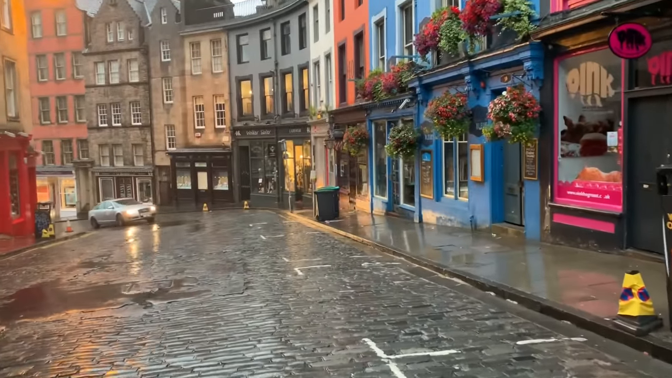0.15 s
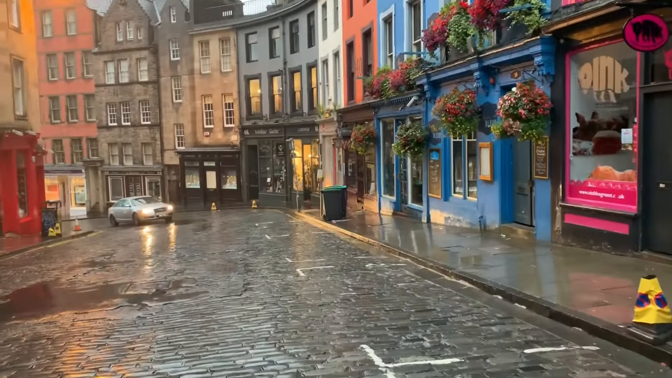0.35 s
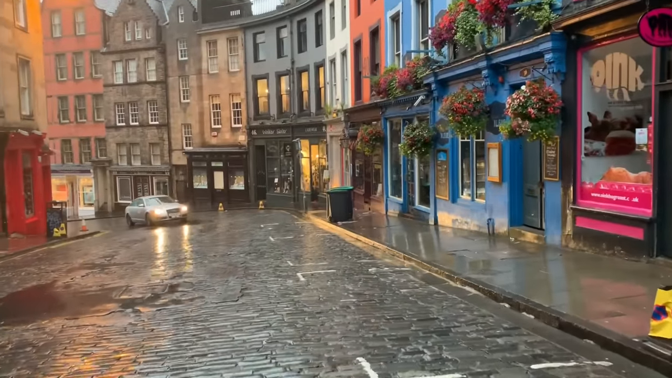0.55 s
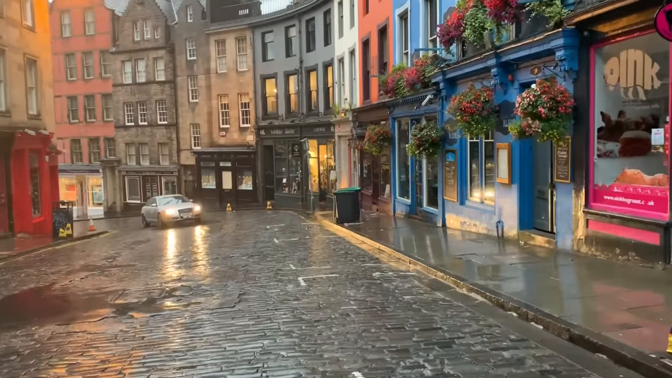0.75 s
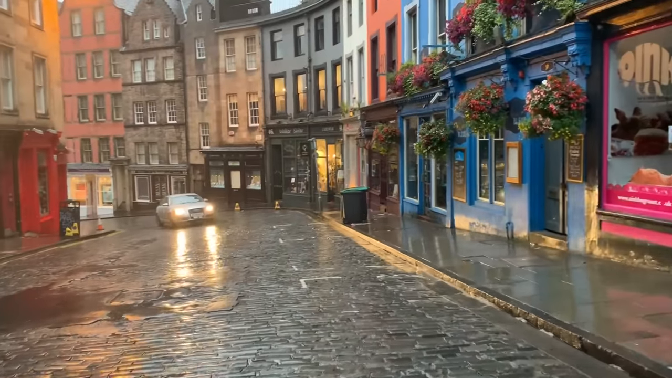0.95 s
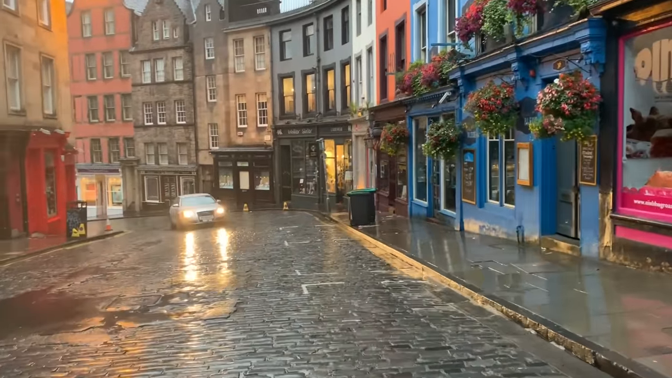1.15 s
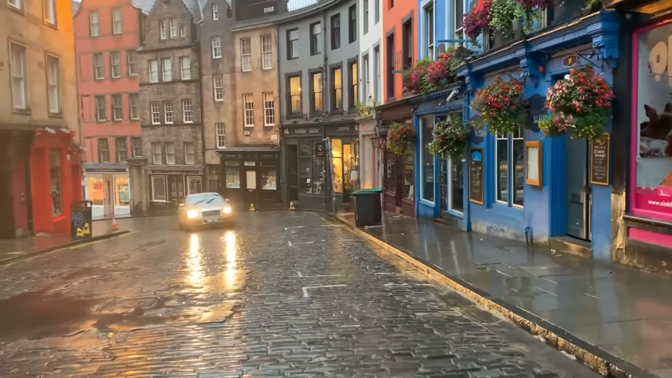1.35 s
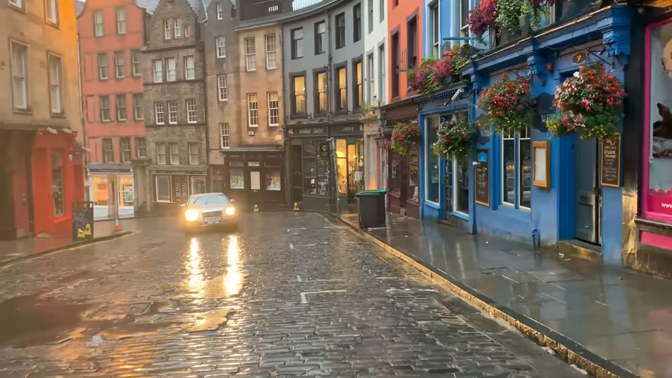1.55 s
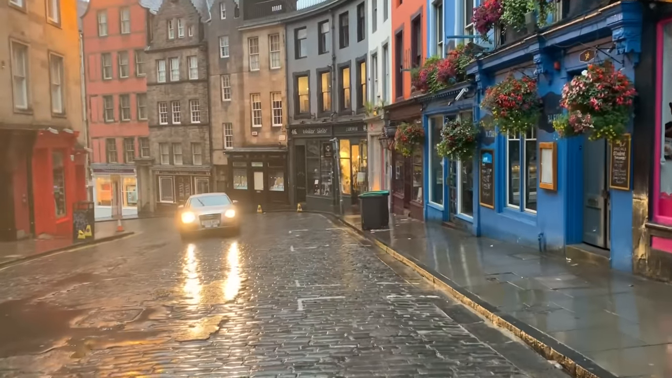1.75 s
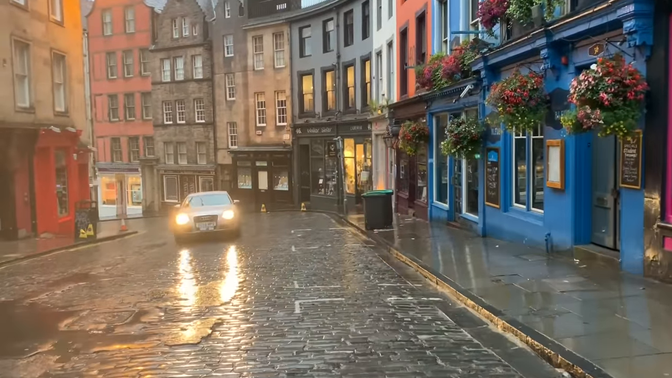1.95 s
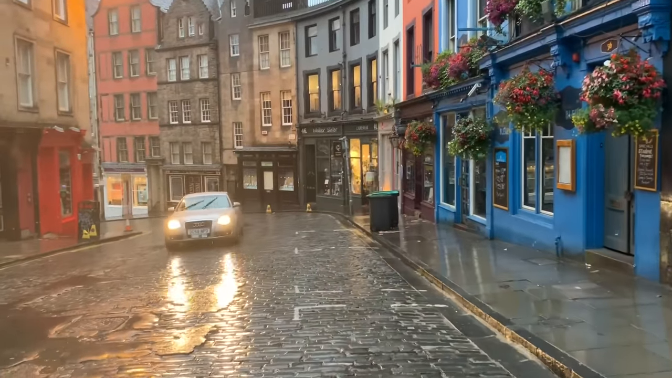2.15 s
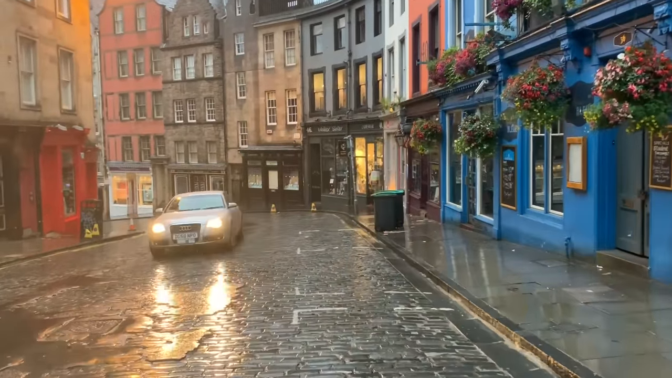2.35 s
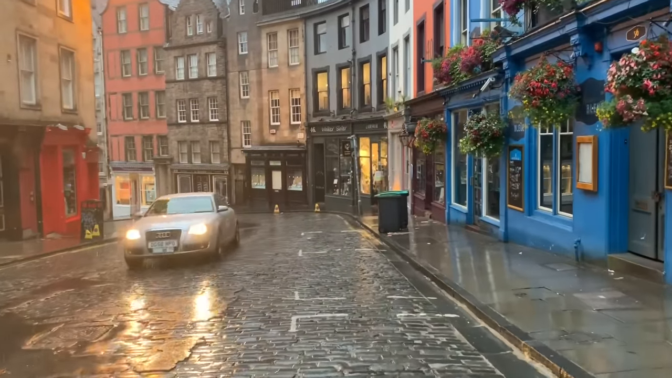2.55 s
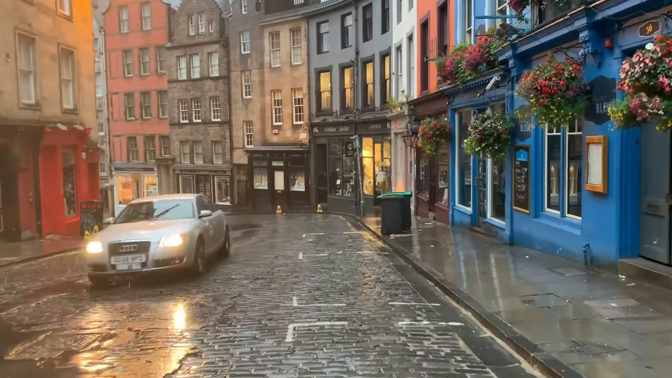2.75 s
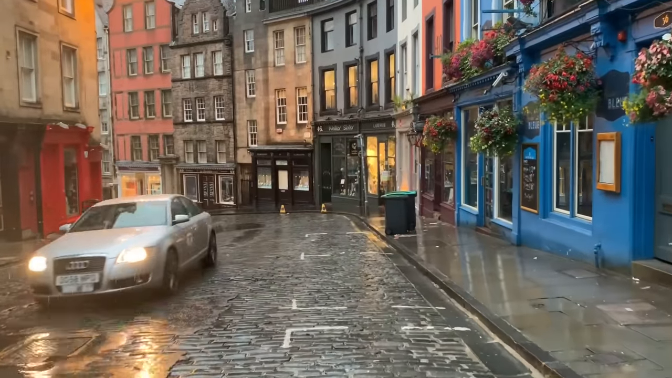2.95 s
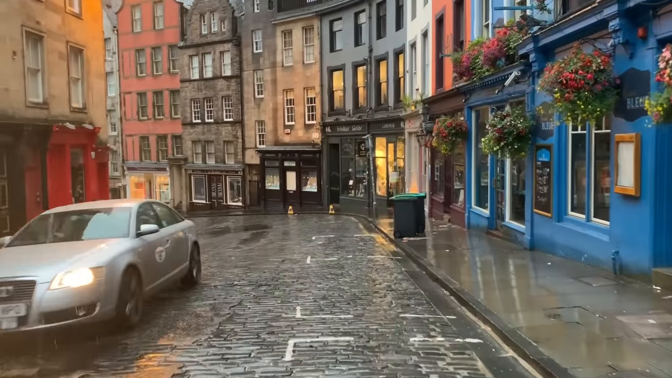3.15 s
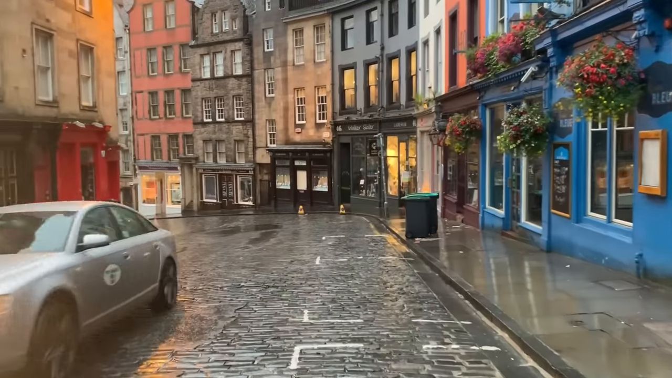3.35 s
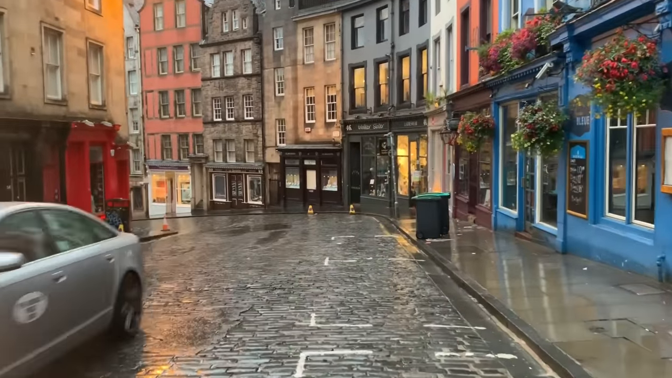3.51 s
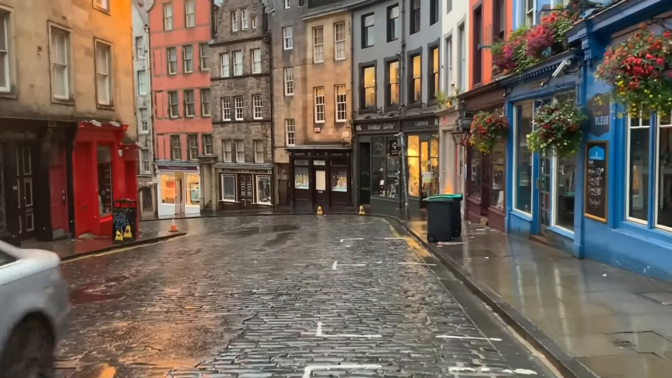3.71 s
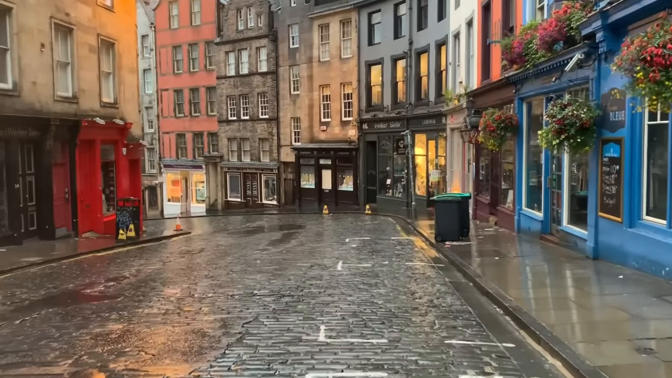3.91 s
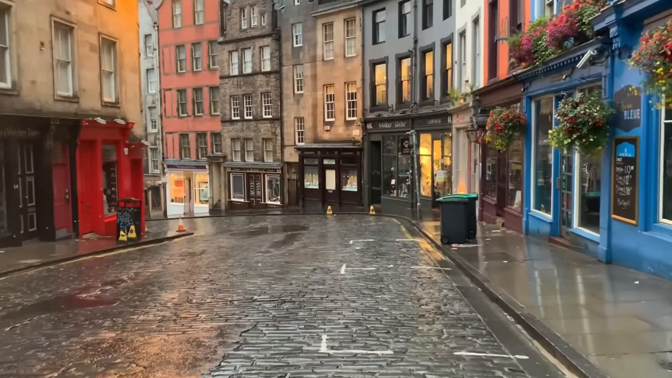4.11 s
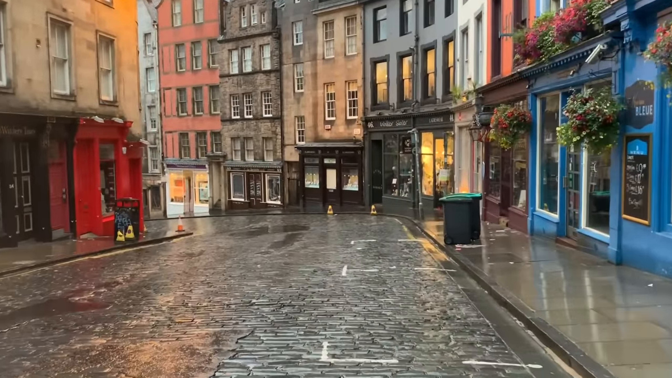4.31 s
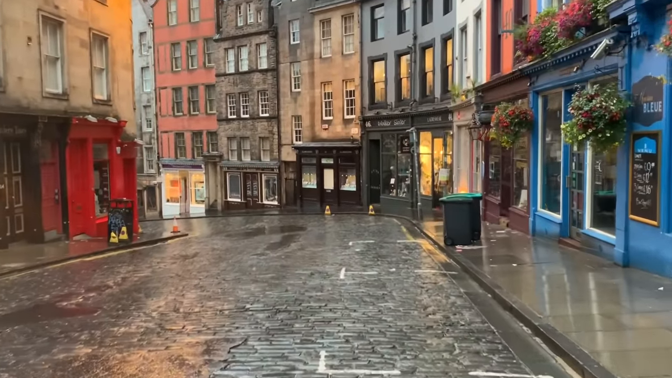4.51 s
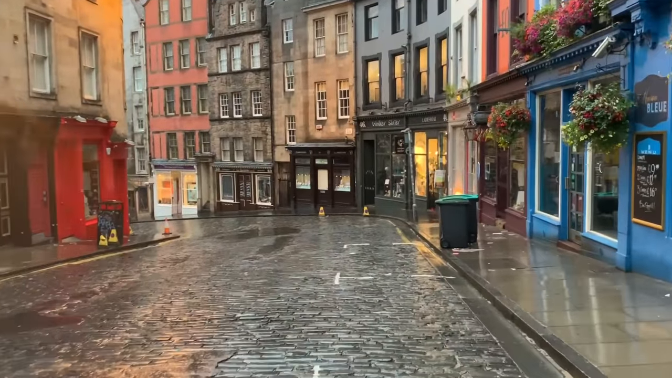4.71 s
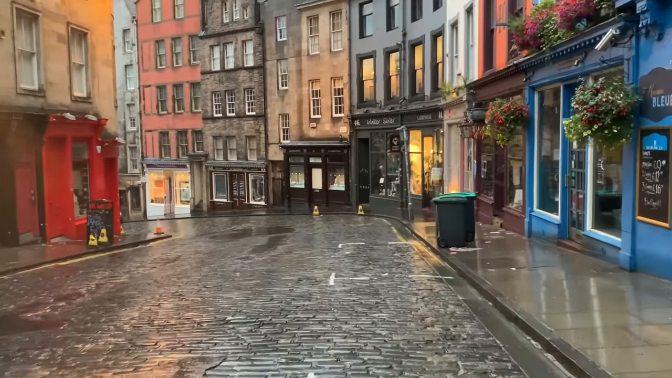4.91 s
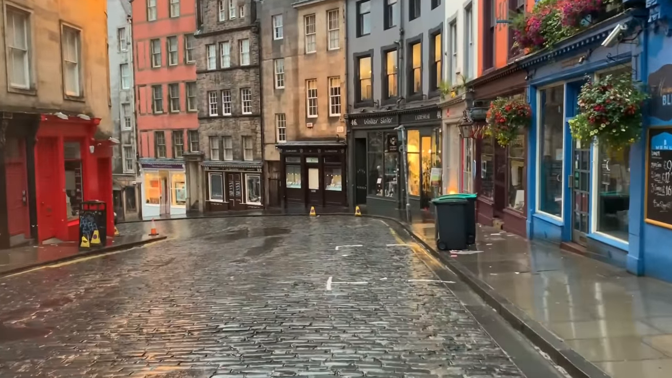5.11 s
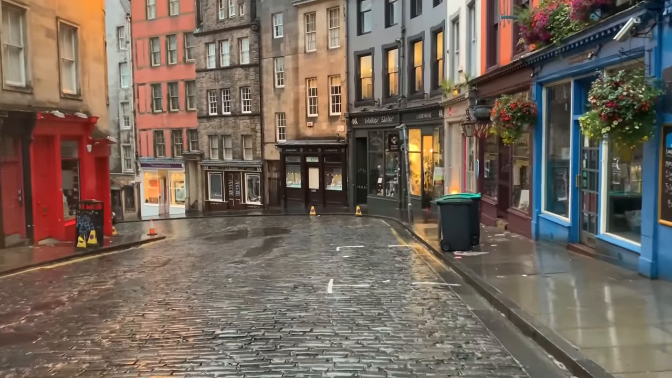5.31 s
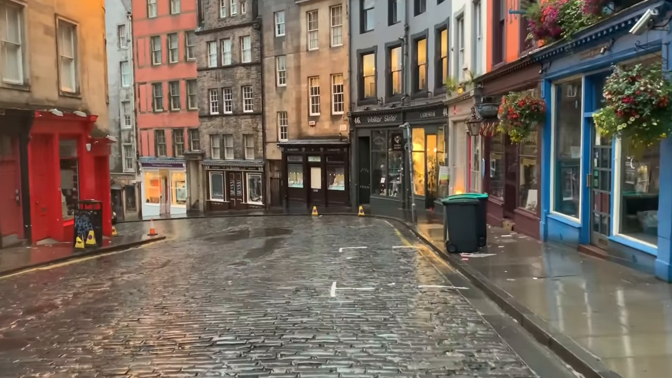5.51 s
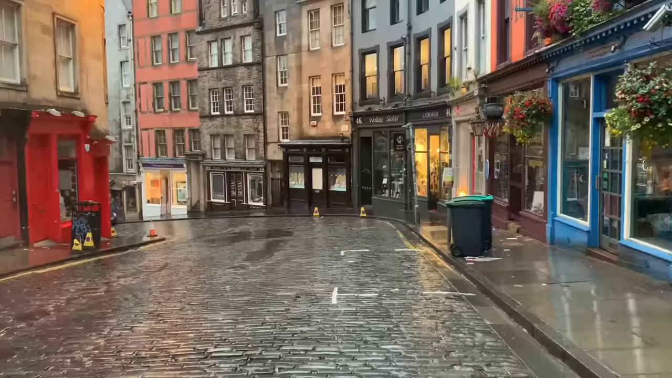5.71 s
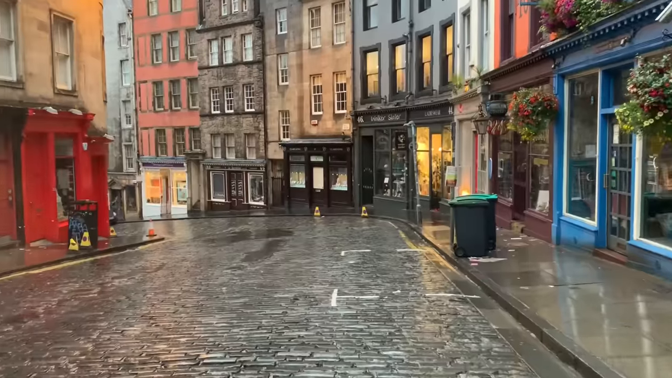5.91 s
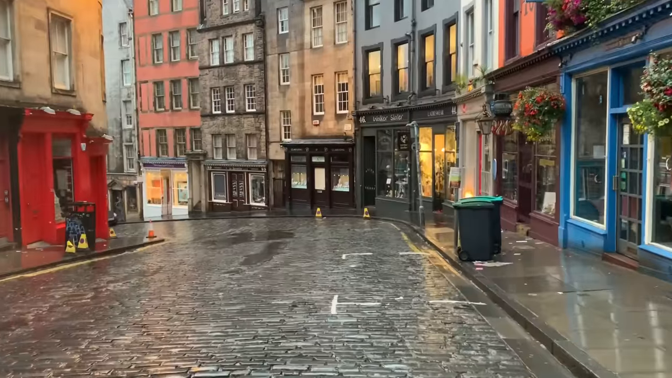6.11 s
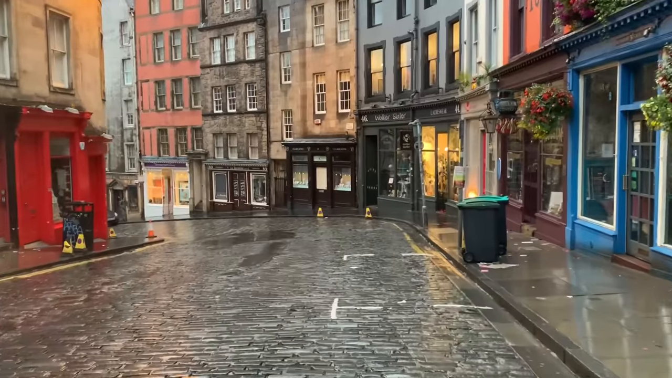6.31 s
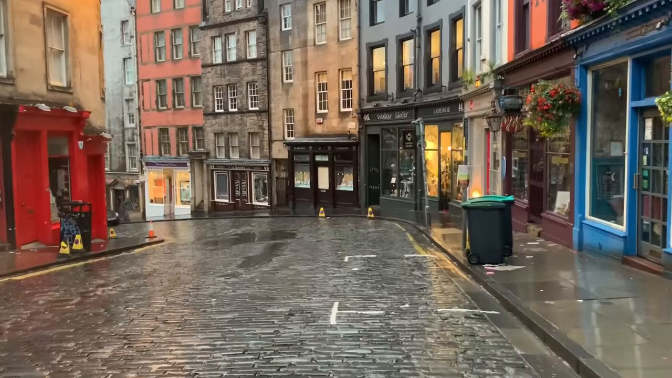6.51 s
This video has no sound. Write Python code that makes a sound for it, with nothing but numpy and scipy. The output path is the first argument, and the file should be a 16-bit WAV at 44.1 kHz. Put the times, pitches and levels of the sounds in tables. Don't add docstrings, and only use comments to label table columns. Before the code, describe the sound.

From a small stereo device standing at the kerb: a car comes up a wet street, engine pitch climbing slightly, tyre rumble and water hiss growing. Around the middle it sweeps past on the left, spray bursting, splashes snapping, stones thumping hollowly against the tyres. Afterwards the roar fades into diffuse house-front echoes, low rumble and thin rain.

```python
import sys
import numpy as np
from scipy import signal
from scipy.fft import rfft, irfft, next_fast_len
from scipy.io import wavfile
from scipy.ndimage import map_coordinates

SR = 44100
rng = np.random.default_rng(int(sys.argv[2]) if len(sys.argv) > 2 else 0)


def volts_from_db(level):
    exponent = np.asarray(level, float) / 20
    return 10 ** exponent


def wrap_up_sound(samples):
    columns = np.atleast_2d(samples).T
    tamed = np.clip(columns, -1, 1)
    steps = np.round(tamed * 32767).astype(np.int16)
    wavfile.write(sys.argv[1], SR, steps)


N = 293694
TIME_S = np.arange(N) / SR


def rms_one(x):
    return x / np.sqrt(np.mean(x ** 2) + 1e-20)


def in_time(rows):
    s, *columns = np.transpose(rows)
    return [np.interp(TIME_S, s, c) for c in columns]


def ramp(start_s, end_s):
    return np.interp(TIME_S, [start_s, end_s], [0, 1])


def at_hz(points, hz):
    points_hz, values = np.transpose(points)
    return np.interp(np.log(np.maximum(hz, 1)), np.log(points_hz), values)


def bumps(rows):
    return sum(height * np.exp(-(2 * (TIME_S - s) / length) ** 2) for s, height, length in rows)


def swells(rows):
    return bumps([(s, volts_from_db(peak_db), length) for s, peak_db, length in rows])


def drift(rate):
    r = np.exp(-40 * np.pi * rate / SR)
    chance = rng.standard_normal(N // 20 + 2002)
    slow = signal.lfilter([1], [1, -2 * r, r * r], chance)[2000:]
    return np.interp(np.arange(N) / 20, np.arange(len(slow)), rms_one(slow))


def phase(hz):
    return 2 * np.pi * np.cumsum(hz) / SR


def grains(per_s, spread_db):
    sizes = volts_from_db(spread_db * np.minimum(rng.exponential(1, N), 4)) * rng.choice([-1, 1], N)
    return rms_one(sizes * (rng.random(N) < per_s / SR))


def coloured(excitation, spectrum, shared_db, own_db, rate):
    size = next_fast_len(N)
    hz = np.fft.rfftfreq(size, 1 / SR)
    level_db = at_hz(spectrum, hz)
    shaped = rfft(excitation, size) * volts_from_db(level_db) * (level_db > -38)
    strip = np.floor(2 * np.log2(np.maximum(hz, 1)))
    together = shared_db * drift(rate)
    out = np.zeros(N)
    for k in np.unique(strip[shaped != 0]):
        flicker = volts_from_db(together + own_db * drift(rate / 2))
        out += irfft(shaped * (strip == k), size)[:N] * flicker
    return rms_one(out)


def rain():
    band = signal.butter(2, [1500, 9000], "band", fs=SR, output="sos")
    sides = [rms_one(signal.sosfilt(band, grains(per_s=1500, spread_db=9.0))) for side in "LR"]
    return volts_from_db(-51) * np.array(sides)


# (time [s], firing rate [Hz])
FIRING = [(0, 54.07), (1.2, 55.03), (1.6, 56.12), (2.2, 58.33), (2.7, 61.56), (3.3, 63.63), (3.8, 62.92),
          (4.3, 63.93), (5.2, 64.7), (6.66, 64.14)]


def firing_phase():
    firing_hz, = in_time(FIRING)
    return phase(firing_hz * (1 + 0.0074 * drift(5.25)))


# (time [s], peak [dB], length [s])
SURGES = [(0.05, -34, 0.16), (0.62, -38, 0.32), (1.15, -31, 0.14), (1.4, -26, 0.31), (1.7, -33, 0.25),
          (1.94, -25, 0.17), (2.22, -25.5, 0.24), (2.45, -28, 0.13), (2.78, -23.5, 0.34),
          (3.05, -23.5, 0.18), (3.29, -19.5, 0.29), (3.55, -22, 0.11), (3.76, -21, 0.15),
          (4.1, -20.5, 0.22), (4.4, -25, .3), (4.7, -26.5, 0.22), (5.0, -25, 0.28), (5.15, -20.5, 0.11),
          (5.4, -27.5, 0.34), (5.75, -28.5, 0.32), (6.1, -30.5, 0.38), (6.47, -31.5, 0.18)]
# (multiple [x], level re hum [dB])
MULTIPLES = [(.5, -32), (2, -17.5), (3, -12.5), (5, -16.5), (6, -22)]


def hum(turn):
    idle_db, trim_db, waver_db = -43, -0.6, 1.16
    level = (swells(SURGES) + volts_from_db(idle_db)) * volts_from_db(trim_db + waver_db * drift(8.5))
    out = level * np.sin(turn)
    for multiple, level_db in MULTIPLES:
        waver = volts_from_db(level_db + 2.2 * drift(2.9))
        out = out + level * waver * np.sin(multiple * turn + rng.uniform(0, 2 * np.pi))
    return np.sqrt(2) * out


# (time [s], peak [dB], length [s])
BOOMS = [(0.146, -34, 0.35), (0.577, -36, 0.43), (0.83, -39, 0.23), (1.016, -29, 0.058),
         (1.242, -32, 0.066), (1.625, -21.5, 0.17), (1.803, -25, 0.056), (2.17, -21.5, 0.072),
         (2.37, -27.5, 0.14), (2.57, -25, 0.08), (2.82, -49, 0.072), (3.02, -23.5, 0.12),
         (3.345, -23.5, 0.15), (3.562, -16.5, 0.2), (3.741, -22, 0.1), (3.92, -27.5, .15), (4.3, -41, 0.23),
         (4.58, -28, 0.07), (4.841, -30.5, 0.11), (5.031, -35, .1), (5.2, -32, 0.36), (5.42, -41, 0.063),
         (5.55, -30.5, .12), (5.93, -42, 0.24), (6.5, -36, 0.16)]


def boom(turn):
    idle_db = -44
    return np.sqrt(2) * (volts_from_db(-4) * swells(BOOMS) + volts_from_db(idle_db)) * np.sin(4 * turn)


# (time [s], pitch [Hz], level [dB])
WHISTLE = [(0, 13150, -85), (1.8, 13150, -64), (2.1, 13100, -55), (3.0, 13000, -52), (3.3, 12750, -48),
           (3.6, 12550, -46), (3.8, 12400, -65), (6.66, 12400, -90)]


def whistle():
    whistle_hz, whistle_db = in_time(WHISTLE)
    return volts_from_db(whistle_db + 3.0 * drift(15)) * np.sin(phase(whistle_hz + 60 * drift(60)))


# (time [s], nearness as spray level [dB], unevenness of the paving [dB])
PASS = [(0, -52.5, 0), (.4, -51, 0.5), (.75, -49.5, 0.5), (.95, -46, -2.5), (1.3, -46.5, -0.1),
        (1.55, -42, 0.5), (2.0, -42.5, 0.5), (2.4, -40.5, 1.5), (2.75, -37, 2), (2.999, -33.5, 2.4),
        (3.3, -31, -1), (3.7, -29.5, 0.6), (4.05, -34.5, 1.5), (4.45, -40.5, 0.5), (4.9, -43.5, 0.5),
        (5.3, -46, 0.9), (5.75, -49.5, 1), (6.66, -54.5, 1.2)]
GONE_S = (4.4, 4.9)


def heard(alongside_db, near_share, rough_share, lag_s, tail_db):
    s, near_db, rough_db = np.transpose(PASS)
    closest_db = -30
    near = near_share * (np.interp(TIME_S - lag_s, s, near_db) - closest_db)
    rough = rough_share * np.interp(TIME_S, s, rough_db)
    return alongside_db + near + rough + tail_db * ramp(*GONE_S)


# (frequency [Hz], density [dB per Hz])
RUMBLE = [(15, -40), (25, -16.5), (49, 4), (64, -5.5), (91, 0), (155, -4.5), (243, -3.5), (349, -13),
          (450, -18), (580, -52), (990, -120)]
# (time [s], more rumble [dB], length [s])
HUMPS = [
    (1.3, -1, .3),
    (2.5, -.7, 0.22),
    (3.05, 2, 0.28),
    (3.3, -2.5, 0.2),
    (4.25, -2, 0.17),
    (4.85, -2, 0.41),
    (5.3, 3.0, .2),
    (5.7, 2.5, .3),
    (6.3, 2, 0.27),
]


def rumble(joints):
    level_db = heard(alongside_db=-23, near_share=.5, rough_share=0.67, lag_s=0.14, tail_db=2.5) + bumps(HUMPS)
    shaking = rng.standard_normal(N) + .15 * joints
    return volts_from_db(level_db + 1.5) * coloured(shaking, RUMBLE, shared_db=.3, own_db=.7, rate=8)


# (frequency [Hz], density [dB per Hz])
ROAR_COMING = [(220, -34), (380, -7.5), (542, -1.5), (715, -6.5), (960, -9.5), (1130, -6.5), (1330, -15.5),
               (1600, -14), (2080, -22), (3520, -120)]
ROAR_CLOSE = [(220, -10), (380, -4.5), (439, 0), (529, -3), (641, 1.5), (741, -2.5), (880, 1), (1220, -7),
              (1600, -25), (2080, -89), (3520, -120)]
ROAR_GONE = [(220, -14.5), (380, -5.5), (421, 1), (463, -5), (555, -5), (600, -4.5), (920, -2.5),
             (1600, -16.5), (2080, -73), (3520, -120)]
# (time [s], more roar [dB], length [s])
STRETCHES = [(1.02, 5, 0.081), (1.95, 3.5, 0.048), (2.5, 1.5, 0.54), (2.78, 3, 0.073), (3.52, -4.5, 0.061),
             (3.72, -0.5, 0.36), (3.87, -7, 0.053), (4.0, 0.5, 0.071), (4.21, 3, 0.071), (4.4, -1, 0.18),
             (4.67, -0.5, 0.087), (5.3, 0.5, 0.25)]


def roar(joints):
    level_db = heard(alongside_db=-23.5, near_share=0.5753, rough_share=0.89, lag_s=0.27, tail_db=0)
    near, gone = ramp(1.5, 2.6), ramp(*GONE_S)
    drumming = rng.standard_normal(N) + 0.55 * joints
    stages = ((1 - near, ROAR_COMING), (near - gone, ROAR_CLOSE), (gone, ROAR_GONE))
    out = sum(share * coloured(drumming, colour, shared_db=1.2, own_db=0.8, rate=19)
              for share, colour in stages)
    return volts_from_db(level_db + bumps(STRETCHES) + 0.9) * out


# (frequency [Hz], density [dB per Hz])
HISS_COMING = [(760, -36), (1300, -1.5), (1430, -5.5), (2250, -4), (2430, -6), (3790, -12), (5590, -18.5),
               (7000, -25.5), (9100, -19.5), (15400, -120)]
HISS_BESIDE = [(760, -18), (1300, -6), (1640, -4.5), (2780, -4), (3490, -8.5), (5000, -9), (7000, -15.5),
               (9100, -25), (15400, -120)]
# (time [s], more hiss [dB], length [s])
PUDDLES = [
    (.7, 1.5, 0.28),
    (1.3, 1.5, 0.39),
    (1.618, 0.5, 0.36),
    (2.55, 1, 0.26),
    (3.22, 4.5, 0.13),
    (3.4, 3, 0.28),
    (4.2, -.7, 0.18),
    (4.856, 2.5, 0.36),
    (5.298, 2, 0.49),
]


def hiss(joints, drops):
    level_db = heard(alongside_db=-30.5, near_share=0.94, rough_share=0.5, lag_s=-0.0043, tail_db=-0.9)
    level_db = level_db + bumps(PUDDLES)
    street_db = -47
    beside = ramp(2.5, 3.2)
    squeeze = rng.standard_normal(N) + 0.48 * joints + 0.24 * drops
    stages = ((1 - beside, HISS_COMING), (beside, HISS_BESIDE))
    out = sum(share * coloured(squeeze, colour, shared_db=1.97, own_db=1.4, rate=63)
              for share, colour in stages)
    return np.hypot(volts_from_db(level_db + 5.5), volts_from_db(street_db + 4.5)) * out


# (frequency [Hz], density [dB per Hz])
SPRAY = [(5000, -25), (6300, -8), (7500, -6), (8150, -2), (8700, -3), (9350, 0), (10100, -2), (11400, -2),
         (12200, -4), (14000, -4.5), (15700, -4.5), (17000, -8)]


def spray(drops):
    level_db = in_time(PASS)[0] + 0.2
    bursting = rng.standard_normal(N) + .6 * drops
    return volts_from_db(level_db + 3.5) * coloured(bursting, SPRAY, shared_db=.75, own_db=.5, rate=45)


def tyres():
    joints = grains(per_s=400, spread_db=2.8)
    mist, big_drops = grains(per_s=3500, spread_db=0.5), grains(per_s=180, spread_db=4.0)
    drops = mist + 0.6 * big_drops
    return rumble(joints) + roar(joints) + hiss(joints, drops) + spray(drops)


# (time [s], peak [dB], middle of the splash [Hz])
SPLASHES = [(0.6948, -33, 3500), (1.39, -22, 8190), (1.429, -20, 11600), (1.5294, -37, 7910),
            (1.7, -19.5, 11200), (1.9494, -30, 8150), (2.516, -25, 3000), (2.546, -24, 8100),
            (2.7174, -18, 11100), (2.836, -14, 4500), (2.9094, -36, 10900), (2.9366, -6.5, 4000),
            (2.9544, -29, 11700), (3.023, -23, 11400), (3.181, -12, 7000), (3.226, -9, 5000),
            (3.247, -16, 7000), (3.291, -18, 6000), (3.318, -11, 10930), (3.355, -18, 7000),
            (3.381, -13, 4120), (3.401, -16, 9000), (3.445, -19, 6000), (3.6114, -13, 10520),
            (3.6977, -19, 11100), (3.724, -10, 3100), (3.9194, -29, 8360), (4.0493, -10, 8210),
            (4.2795, -23, 11850), (4.554, -21, 11000), (4.6074, -21, 3500), (4.721, -26, 3000),
            (4.978, -22, 3300), (5.2002, -21, 3830), (6.19, -35, 3740), (6.5045, -33, 10330)]


def splashes():
    out, t = np.zeros(N + SR), np.arange(SR // 5) / SR
    rise_s, t60_s = 0.0068, 0.044
    shape = (1 - np.exp(-t / rise_s)) * volts_from_db(0.5 - 60 * t / t60_s)
    for s, peak_db, mid_hz in SPLASHES:
        edges_hz = [mid_hz * .3, min(mid_hz * 2.4, .45 * SR)]
        band = signal.butter(1, edges_hz, "band", fs=SR, output="sos")
        burst = rms_one(signal.sosfilt(band, rng.standard_normal(len(t))))
        out[round(s * SR):][:len(t)] += volts_from_db(peak_db) * shape * burst
    return out[:N]


# (time [s], peak [dB], ring [Hz])
STONES = [(1.951, -17.5, 950), (2.049, -21.5, 633), (2.075, -29, 563), (2.118, -17, 855), (2.136, -17, 746),
          (2.342, -25, 770), (2.391, -19, 1140), (2.455, -21, 540), (2.518, -21, 724), (2.593, -17.5, 641),
          (2.626, -18.5, 720), (2.668, -16, 1020), (2.773, -20, 565), (2.842, -15, 610), (2.87, -18, 921),
          (2.938, -21, 745), (2.992, -18, 563), (3.058, -18, 915), (3.118, -11, 888), (3.14, -15.5, 501),
          (3.19, -17, 767), (3.245, -18, 863), (3.278, -15, 853), (3.303, -17.5, 567), (3.347, -20, 627),
          (3.392, -15, 830), (3.413, -18, 610), (3.443, -22, 591), (3.472, -14.5, 639), (3.545, -22, 519),
          (3.596, -12, 850), (3.614, -10, 689), (3.657, -10.5, 796), (3.687, -13, 826), (3.734, -16, 790),
          (3.762, -6, 851), (3.809, -9, 660), (3.851, -9.5, 640), (3.913, -15, 622), (3.972, -7.5, 710),
          (4.03, -15, 674), (4.052, -16, 510), (4.08, -12, 800), (4.11, -3.5, 781), (4.137, -14, 780),
          (4.164, -11.5, 730), (4.194, -9, 773), (4.279, -20, 903), (4.323, -8.5, 678), (4.417, -13, 741),
          (4.436, -18, 740), (4.462, -12.5, 785), (4.506, -24, 794), (4.549, -11.5, 910),
          (4.607, -17.5, 588)]


def stones():
    out, t = np.zeros(N + SR), np.arange(SR // 10) / SR
    crack_db, belt_cycles = -9, 23
    at_tyre_db = 5.2
    rise = 1 - np.exp(-t / .0006)
    for s, peak_db, ring_hz in STONES:
        crack = rng.standard_normal(len(t)) * volts_from_db(crack_db - 60 * t / .012)
        dull_crack = signal.lfilter([.3], [1, -.78], crack)
        ring = volts_from_db(-60 * t * ring_hz / belt_cycles) * rise * np.sin(2 * np.pi * ring_hz * t)
        out[round(s * SR):][:len(t)] += volts_from_db(peak_db + at_tyre_db) * (ring + dull_crack)
    return out[:N]


# (time [s], peak [dB], length [s])
MOANS = [
    (2.95, -31.5, 0.11),
    (3.12, -33, .12),
]


def moan(turn):
    level = swells(MOANS) * volts_from_db(3.0 * drift(20.5))
    return np.sqrt(2) * level * np.sin(7 * turn + 1.5 * drift(15))


# (time [s], peak [dB], length [s])
BODY = [
    (3.57, -26, 0.12),
    (4.22, -24.5, 0.087),
    (4.5, -29, 0.19),
    (5.3, -31.5, 0.24),
]


def body():
    return np.sqrt(2) * swells(BODY) * np.sin(phase(213.8 + 2.76 * drift(6.8)))


# (frequency [Hz], density [dB per Hz])
DRONE = [(15, -40), (28, -18), (46, -2), (60, -10), (80, -11), (120, -15), (200, -38)]


def drone():
    ringing = coloured(rng.standard_normal(N), DRONE, shared_db=-3.5, own_db=-0.5, rate=5.7)
    return volts_from_db(-28.5) * ramp(3.6, 4.9) * ringing


def reverberate(sent):
    t60_s, first_wall_s = .45, .006
    hop, t = SR // 40, np.arange(SR // 3) / SR
    lead_in = 12 * hop
    sent = np.concatenate([sent[:lead_in][::-1], sent, np.zeros(2 * hop)])
    window = np.sin(np.pi * np.arange(2 * hop) / (2 * hop))
    echo = np.zeros((2, len(sent) + SR))
    for i in range(0, len(sent) - 2 * hop, hop):
        walls = rng.standard_normal((2, len(t))) * volts_from_db(-60 * t / t60_s) * (t > first_wall_s)
        walls /= np.linalg.norm(walls, axis=1)[:, None]
        piece = sent[i:i + 2 * hop] * window
        echo[:, i:i + 2 * hop + len(t) - 1] += signal.fftconvolve(walls, piece[None], axes=1)
    return echo[:, lead_in:lead_in + N]


# (time [s], left lead in the lows [ms], frequency where the highs are in step [Hz],
# echo re direct in the lows [dB], echo re direct in the highs [dB])
BEARING = [(0, -.07, 1800, 0, 5), (2, -.08, 1800, 0, 2), (2.6, -.05, 1800, 0, -3), (2.85, 0, 1700, 0, -11),
           (3.05, .03, 1600, 0, -19), (3.2, .08, 1500, -1, -14), (3.4, .15, 1350, -2, -15),
           (3.62, .27, 600, -3, -7), (4, .33, 150, -3, -3), (4.4, .42, -300, -1, 2), (4.9, .45, -500, 2, 8),
           (5.6, .4, -500, 5, 9), (6.66, .35, -500, 6, 9)]
# (frequency [Hz], echo re direct [dB])
ECHO = [(30, -26), (120, -13.5), (300, -7.5), (600, -3.5), (1200, 1.5), (1900, 8.5), (2600, 5.5),
        (3800, 3.5), (4800, 2.5), (5600, 8), (6500, 11.5), (8000, 3), (16000, -1)]


def street(car):
    lead_low_ms, in_step_hz, echo_low_db, echo_high_db = in_time(BEARING)
    shadow_hz = 1720
    detour_ms = .33
    wrap_hz = 4600
    low = signal.sosfiltfilt(signal.butter(2, shadow_hz, fs=SR, output="sos"), car)
    high = signal.hilbert(car - low, next_fast_len(N))[:N]
    top = signal.sosfiltfilt(signal.butter(3, wrap_hz, "high", fs=SR, output="sos"), high)
    turn = np.exp(-1j * np.pi * in_step_hz * detour_ms / 1000)
    held = turn * np.exp(1j * np.pi * wrap_hz * detour_ms / 1000)
    bent = [np.real((high - top) * turn), np.real((high - top) / turn)]
    wrapped = [np.real(top * held), np.real(top / held)]

    direct, sent = np.zeros((2, N)), np.zeros(N)
    bands = (([low, low], lead_low_ms, echo_low_db), (bent, detour_ms, echo_high_db), (wrapped, 0, echo_high_db))
    for sides, lead_ms, echo_db in bands:
        total = np.sqrt((1 + volts_from_db(2 * echo_db)) / 2)
        for port, sign in enumerate((1, -1)):
            moment = np.arange(N) + sign * lead_ms * SR / 2000
            direct[port] += map_coordinates(sides[port] / total, [moment], order=3)
        sent += sides[0] * volts_from_db(echo_db) / total

    size = next_fast_len(N)
    share = volts_from_db(at_hz(ECHO, np.fft.rfftfreq(size, 1 / SR)))
    both = rfft(direct, size) + share * rfft(reverberate(sent), size)
    return irfft(both / np.sqrt(1 + share ** 2), size)[:, :N]


def scene():
    turn = firing_phase()
    engine = hum(turn) + boom(turn) + whistle() + moan(turn)
    car = engine + tyres() + splashes() + stones() + body() + drone()
    return street(car) + rain()


# (frequency [Hz], left minus right [dB])
TILT = [(60, 0), (110, -2), (200, -0.5), (380, 0), (700, 1.5), (1290, 3), (2380, 1), (4400, -1),
        (8120, -7.5), (15000, 0.0)]


def port_colours(ports, hz):
    return ports * volts_from_db(np.outer([.5, -.5], at_hz(TILT, hz)))


# (frequency [Hz], share from that microphone [0-1])
SHARED_TOP = [(4800, 0), (5600, .1), (6700, .22), (7600, 1)]


def share_top(sound, left, hz):
    in_step_hz, turn_hz = 7946, 3650
    angle = np.pi * (np.minimum(hz, 15300) - in_step_hz) / turn_hz
    lagged = left * np.exp(np.outer([-1j, 1j], angle))
    single = at_hz(SHARED_TOP, hz) * np.pi / 2
    return np.cos(single) * sound + np.sin(single) * lagged


def low_pass(x):
    return signal.sosfilt(signal.butter(12, 17070, fs=SR, output="sos"), x)


def record(dry):
    size = next_fast_len(N)
    hz, ports = np.fft.rfftfreq(size, 1 / SR), rfft(dry, size)
    sound = share_top(port_colours(ports, hz), ports[0], hz) * (hz < 15780)
    mix = np.clip(irfft(sound, size)[:, :N], -1, 1)
    return low_pass(mix)


dry = scene()
out = record(dry)
wrap_up_sound(out)
```